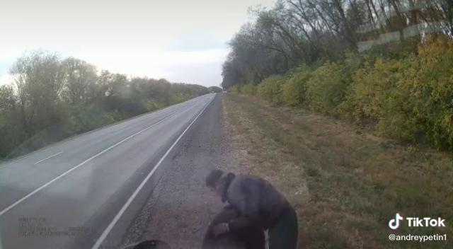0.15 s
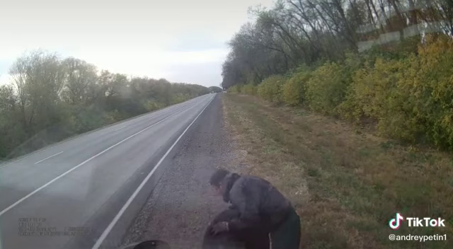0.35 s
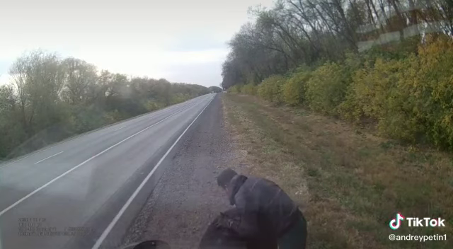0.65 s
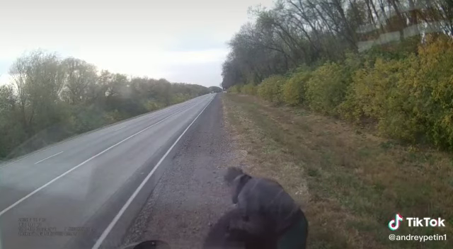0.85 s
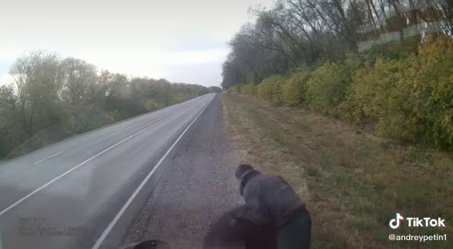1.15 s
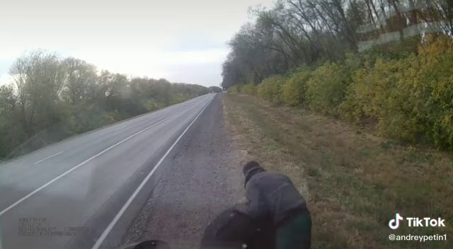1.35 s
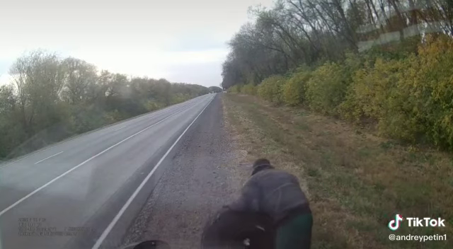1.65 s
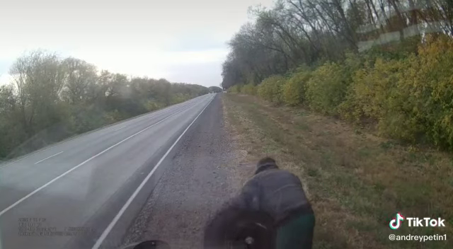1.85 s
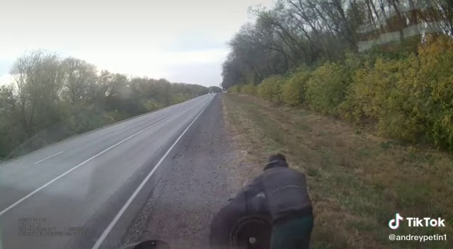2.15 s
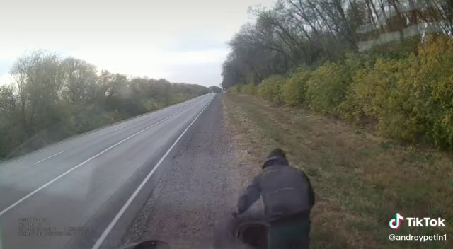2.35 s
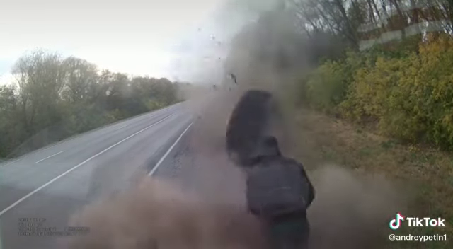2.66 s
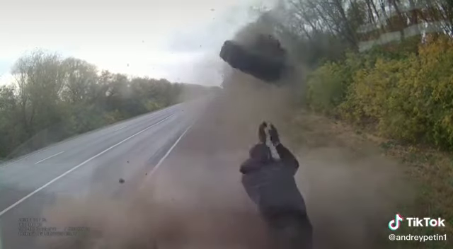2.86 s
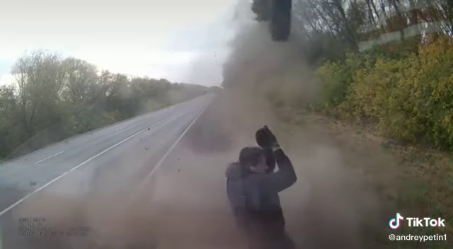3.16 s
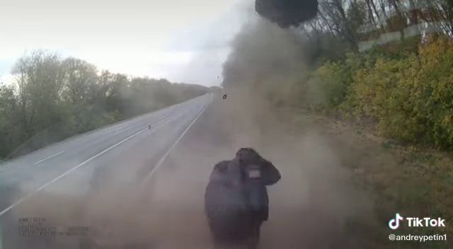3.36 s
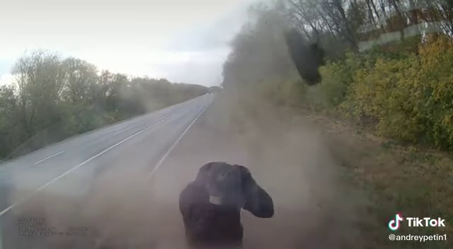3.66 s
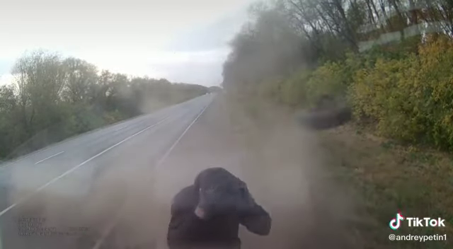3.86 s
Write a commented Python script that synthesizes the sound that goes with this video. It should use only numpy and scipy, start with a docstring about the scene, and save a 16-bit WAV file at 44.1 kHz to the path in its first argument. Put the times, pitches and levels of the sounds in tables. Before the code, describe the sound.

A violent tyre burst breaks a quiet fan hum in a car cabin; the close microphone distorts, harsh grit sprays the windscreen, stones ping and thud, clods knock the bonnet, and falling dirt patters.

```python
"""Heard from inside a parked car on a gravel verge: a fan hums and hisses (filtered noise) throughout.
A tyre bursts: swinging cabin modes and noise make a thump and boom that overload the microphone.
A spray of grit, made of random clicks, hits the windscreen, and single stones crack, ring and thud on the car.
Heavy clods ring the bonnet while sand, then earth with pebbles, patters down in more random clicks."""
import sys
import numpy as np
from scipy import signal
from scipy.fft import rfft, irfft
from scipy.io import wavfile
from scipy.ndimage import map_coordinates

SR = 44100
rng = np.random.default_rng(int(sys.argv[2]) if len(sys.argv) > 2 else 0)


def digitize_waveform(pressure):
    """Quantize a signal to 16-bit integers and store it at the path in sys.argv[1].

    Rows of a 2-D input are taken as channels; values are limited to [-1, 1].
    """
    field = np.atleast_2d(pressure).T
    bounded = np.clip(field, -1, 1)
    quanta = np.round(bounded * 32767).astype(np.int16)
    wavfile.write(sys.argv[1], SR, quanta)


N = 176400
TIME = np.arange(N) / SR  # seconds
FREQS = np.maximum(np.fft.rfftfreq(N, 1 / SR), 1)  # Hz, kept above zero for the logarithm

# In every spectrum only the shape counts, because the filtered sound is scaled to rms 1.
# A t60 is the time in seconds that a sound takes to fade by 60 dB.

# Tone of the fan's air. Each row: frequency in Hz, strength in relative dB per Hz.
FAN_SPECTRUM = [(30, 9), (50, 1), (78, 8), (102, 0), (215, 6.5), (285, -4.5), (450, 4), (850, -7.5),
                (1200, -3.5), (2300, -1.5), (3300, -6), (5000, -3.5), (6700, -16), (7500, -21.5),
                (9800, -20), (12700, -12.5), (15600, -18)]
# Resonances of the fan's ducts. Each row: frequency in Hz, width in Hz, height in dB above the spectrum.
DUCT_RESONANCES = [(352, 32, 12.5), (733, 32, 16.8), (933, 17, 13.7), (1425, 32, 11.2), (1842, 11, 14),
                   (2137, 22, 16.6), (2325, 28, 10.5), (2790, 150, 1.9), (4990, 74, 5), (6720, 310, 10.7)]
FAN_DB, FAN_WAVER_S, FAN_WAVER_PER_S = -46.5, 0.00025, 3.25  # waver: size of the time shift, and its pace
IDLE_HZ, IDLE_WIDTH_HZ, IDLE_DB = 83.7, 3.3, -64.5  # faint low hum; width of each of its two filters

# Tone of the blast's boom in the cabin. Each row: frequency in Hz, strength in relative dB per Hz.
BOOM_SPECTRUM = [(30, -14), (70, 5), (170, 6), (420, -5), (930, -2.5), (1150, -10), (2500, -14),
                 (8000, -45)]
# Resonances of the cabin. Each row: frequency in Hz, width in Hz, height in dB above the spectrum.
CABIN_RESONANCES = [(207, 35, 2.6), (332, 52, 4.5), (552, 41, 8.4), (699, 38, 4.8), (770, 40, 1.7),
                    (855, 33, 5.4), (955, 15, 1.6)]
# Tone of the slow pressure wave. Each row: frequency in Hz, strength in relative dB per Hz.
PUSH_SPECTRUM = [(15, -15), (45, -12), (85, -5.5), (140, -13.5), (200, -18), (340, -9.5), (700, -11.5),
                 (1100, -39)]
# Lowest cabin modes. Each row: frequency in Hz, width in Hz, height in dB above the spectrum.
PUSH_RESONANCES = [(76.5, 7.7, 8), (123, 12, 12.5)]
BURST_S, BURST_ATTACK_S, BURST_HOLD_S = 2.406, 0.014, 0.017
THUMP_DB, THUMP_T60_S = -22.5, 0.11  # level of each mode in the first blow
BOOM_DB, BOOM_T60_S = -21, 1.38
SURGE_DB, SURGES_PER_S = 1, 23  # typical size and pace of the surges in the boom
PUSH_DB, PUSH_ATTACK_S, PUSH_HOLD_S, PUSH_T60_S = -13.5, 0.015, 0.022, 0.34

# Strength of the grit spray over time. Each row: time in seconds, level in dB.
SPRAY_LEVEL = [(2.405, -71), (2.413, -55), (2.417, -17), (2.443, -16), (2.453, -5), (2.483, -17.5),
               (2.506, -12.5), (2.56, -19.5), (2.602, -21), (2.64, -7.5), (2.688, -28), (2.716, -12),
               (2.775, -21.5), (2.805, -25.5), (2.83, -35), (2.96, -54), (3.1, -79)]
# Tone of the grit. Each row: frequency in Hz, strength in relative dB per Hz.
GRIT_SPECTRUM = [(150, -14.5), (600, -2), (1200, -1), (1800, -0.5), (2250, 2.5), (3000, 0), (4500, -1.5),
                 (6800, -1.5), (8000, -5), (11000, -13), (15500, -15.5)]
GRIT_PER_S, GRIT_SPREAD_DB = 4000, 6
SPOT_T60_S, SPOT_WET_DB = 0.048, 3.5  # reflections from each spot that the debris hits

# Stones striking the car. Each row: start in seconds, level in dB, ring pitch in Hz, ring in dB,
# t60 in seconds, thud in dB. Ring and thud are relative to the row's level.
STONE_HITS = [(2.415, -13.5, 3530, -9, 0.091, -8), (2.4327, -8.5, 3290, -5, 0.015, -21),
              (2.498, -10, 6440, -18, 0.012, 7), (2.636, 12.5, 4300, -35, 0.031, -9.5),
              (2.6644, 4, 6690, -13, 0.02, -27), (2.674, -7, 5520, -17, 0.085, -7.5),
              (2.71, 0.5, 5860, -7, 0.023, -27), (2.7432, -15.5, 3300, -4, 0.03, -7),
              (2.7833, -13.5, 5320, -9, 0.0082, -2), (2.806, -17.5, 2290, -7, 0.029, -10.5),
              (2.8384, -6.5, 6400, -16, 0.0048, -24), (2.8705, -25, 2310, -9.5, 0.11, -11.5),
              (2.924, -28.5, 5830, -6.5, 0.12, -27), (2.984, -32.5, 3140, -12, 0.11, -18),
              (3.062, -31.5, 3860, -9, 0.14, -26), (3.0837, -16.5, 3310, -8.5, 0.076, -11),
              (3.154, -19, 4840, -9, 0.085, -32), (3.159, -31, 2175, -1, 0.045, -35),
              (3.2474, -30.5, 2200, -6, 0.019, -6), (3.3614, -16.5, 2560, -7, 0.14, -9),
              (3.376, -25, 2840, -3, 0.1, -6), (3.464, -27, 1590, -22, 0.032, -7),
              (3.5518, -28, 3770, -17, 0.0086, -24), (3.572, -31, 3860, -4, 0.022, -13),
              (3.6009, -15, 3800, -11, 0.051, -32), (3.624, -30, 2317, 12, 0.025, -3),
              (3.6315, -33.5, 2310, 1, 0.075, 2.5), (3.6805, -31.5, 6120, -6, 0.1, -14),
              (3.696, -28.5, 1666, -4, 0.16, -16), (3.7865, -20, 6750, 11, 0.0042, -17),
              (3.789, -32.5, 6260, 4, 0.11, -10), (3.805, -29, 10250, -5, 0.03, -21),
              (3.831, -39.5, 1700, 5, 0.12, -13)]
# Tone of a stone's crack. Each row: frequency in Hz, strength in relative dB per Hz.
CRACK_SPECTRUM = [(300, -9), (1200, -15), (1900, -1), (2600, -1), (4500, -2), (6600, -1), (8000, -7.5),
                  (11000, -15), (15500, -16.5)]
STONE_ATTACK_S, STONE_HOLD_S = 0.00053, 0.0003
CHIPS_PER_S, CHIP_SPREAD_DB = 16000, 1
RING_WIDTH_HZ, RING_ROUGH_DB = 710, -0.5  # the rattle in a stone's ring

# Heavy clods landing on the bonnet. Each row: start in seconds, level in dB, pitch in Hz.
CLOD_HITS = [(2.486, -14.5, 562), (2.490, -14, 980), (2.565, -18.5, 262), (2.652, -19, 622),
             (3.364, -17.5, 850), (3.374, -20, 296), (3.387, -20.5, 595), (3.697, -28, 349),
             (3.864, -29.5, 502), (3.884, -29.5, 638)]
# Tone of the car's panel. Each row: frequency in Hz, strength in relative dB per Hz.
PANEL_SPECTRUM = [(50, -30), (100, -11.5), (200, -5), (450, -6.5), (900, -10.5), (1300, -17), (3000, -37.5)]
# Resonances of the panel. Each row: frequency in Hz, width in Hz, height in dB above the spectrum.
PANEL_RESONANCES = [(235.7, 13, 10.7), (396, 32, 6), (557, 40, 10.8), (609, 26, 8.2), (674, 40, 12),
                    (820, 10.5, 13), (1012, 25, 14)]
CLOD_ATTACK_S, CLOD_HOLD_S, CLOD_T60_S = 0.0036, 0.002, 0.11
CLOD_THUD_DB, CLOD_SPREAD_OCTAVES = -7, 0.35  # spread: how far from its pitch a clod excites the modes

# Strength of the falling sand over time. Each row: time in seconds, level in dB.
SAND_LEVEL = [(2.7, -72), (2.85, -32), (2.965, -43.5), (3.02, -35.5), (3.14, -40), (3.205, -38.5),
              (3.24, -32.5), (3.29, -34.5), (3.32, -36), (3.42, -41), (3.55, -40), (3.665, -42.5),
              (3.78, -33), (3.87, -37), (4.0, -42)]
# Tone of the sand. Each row: frequency in Hz, strength in relative dB per Hz.
SAND_SPECTRUM = [(150, -29), (350, -11), (1150, -4.5), (1800, -2.5), (2300, 2.5), (3200, -1.5),
                 (4700, -3.5), (6500, -2), (8000, -10), (11000, -17), (15500, -22)]
SAND_PER_S, SAND_SPREAD_DB = 910, 1.5

# Strength of the falling earth over time. Each row: time in seconds, level in dB.
EARTH_LEVEL = [(2.9, -62), (3.2, -47.5), (3.34, -43.5), (3.44, -35), (3.53, -44), (3.66, -37), (3.71, -37),
               (3.75, -36), (3.87, -35), (4.0, -37)]
# Tone of the earth on the bodywork. Each row: frequency in Hz, strength in relative dB per Hz.
EARTH_SPECTRUM = [(50, -23), (100, -8), (230, 4), (400, -1), (560, 4), (1000, 0), (1650, 1), (2500, -1),
                  (5000, -28)]
EARTH_PER_S, EARTH_SPREAD_DB = 930, 2.5
PEBBLES_PER_S, PEBBLE_SPREAD_DB, PEBBLE_DB = 240, 3, -3.5  # level relative to the earth
PEBBLE_LOW_HZ, PEBBLE_HIGH_HZ, PEBBLE_Q = 320, 2502, 70  # Q: pitch divided by width

OVERLOAD = 0.22  # the largest swing the microphone can pass on
LOW_CUT_HZ, AIR_HZ, CUTOFF_HZ = 195, 13600, 15700


def from_db(db):
    """Turn decibels into a gain."""
    return 10 ** (np.asarray(db) / 20)


def rms_one(x):
    """Scale a sound to an average power of 1."""
    return x / np.sqrt(np.mean(x ** 2) + 1e-20)


def level(curve):
    """Follow a curve of times and dB: silent before its first row, steady after its last."""
    seconds, db = np.transpose(curve)
    return from_db(np.interp(TIME, seconds, db)) * (TIME >= seconds[0])


def envelope(start, attack, hold, t60):
    """Rise in a straight line, hold, then die away exponentially."""
    age = TIME - start
    rise = np.clip(age / attack, 0, 1)
    decay = from_db(-60 * np.clip((age - attack - hold) / t60, 0, 3))
    return rise * decay


def colour(x, spectrum, resonances=()):
    """Filter a sound to a smooth spectrum with resonant peaks, without sounding ahead of it; rms 1."""
    hz, db = np.transpose(spectrum)
    peaks = 1
    for peak_hz, width_hz, height_db in resonances:
        peaks = peaks + from_db(2 * height_db) / (1 + (2 * (FREQS - peak_hz) / width_hz) ** 2)
    gain = from_db(np.interp(np.log(FREQS), np.log(hz), db)) * np.sqrt(peaks)
    # Folding the cepstrum gives the minimum-phase filter: the same gain, with the earliest response.
    cepstrum = irfft(np.log(gain), N)
    cepstrum[1:N // 2] *= 2
    cepstrum[N // 2 + 1:] = 0
    response = np.exp(rfft(cepstrum))
    return rms_one(irfft(rfft(x) * response, N))


def noise(spectrum, resonances=()):
    """Make steady noise with a given tone."""
    return colour(rng.standard_normal(N), spectrum, resonances)


def resonate(x, hz, width_hz):
    """Ring a single resonance, wider meaning shorter; rms 1."""
    radius = np.exp(-np.pi * width_hz / SR)
    feedback = [1, -2 * radius * np.cos(2 * np.pi * hz / SR), radius * radius]
    return rms_one(signal.lfilter([1, 0, -1], feedback, x))


def sine(start, hz):
    """A pure swing that crosses zero upwards at the start time; rms 1."""
    return np.sqrt(2) * np.sin(2 * np.pi * hz * (TIME - start))


def drift(per_s):
    """Wander slowly by chance around zero, with a typical size of 1."""
    slow = rfft(rng.standard_normal(N)) / (1 + (FREQS / per_s) ** 4)
    return rms_one(irfft(slow, N))


def cabin(x, t60, wet_db):
    """Add dense, quickly dying reflections in the small cabin, keeping about the same power."""
    age = TIME[:SR // 10]
    echoes = rng.standard_normal(len(age)) * from_db(-60 * age / t60)
    echoes = echoes / np.linalg.norm(echoes)
    wet = from_db(wet_db)
    reflected = signal.fftconvolve(x, echoes)[:N]
    return (x + wet * reflected) / np.hypot(1, wet)


def grains(per_s, spread_db):
    """Scatter tiny clicks at random, mostly small and a few large."""
    sizes = from_db(spread_db * np.minimum(rng.exponential(1, N), 4))
    signs = rng.choice([-1, 1], N)
    hits = rng.random(N) < per_s / SR
    return sizes * signs * hits


def patter(per_s, spread_db, count=14):
    """Share grains among several spots of the car, each with its own reflections."""
    return sum(cabin(grains(per_s / count, spread_db), SPOT_T60_S, SPOT_WET_DB) for _ in range(count))


def fan():
    """Air rushes unsteadily through resonant ducts, its hiss rippled by reflections, over a faint hum."""
    air = noise(FAN_SPECTRUM, DUCT_RESONANCES)
    low_pass = signal.butter(4, 3000, fs=SR, output="sos")
    low = signal.sosfiltfilt(low_pass, air)
    hiss = cabin(air - low, t60=0.07, wet_db=-5)
    # Reading the sound slightly early or late makes its tones waver.
    read_times = TIME + FAN_WAVER_S * drift(FAN_WAVER_PER_S)
    rush = map_coordinates(low + hiss, [read_times * SR], order=3, mode="mirror")
    hum = resonate(rng.standard_normal(N), IDLE_HZ, IDLE_WIDTH_HZ)
    hum = resonate(hum, IDLE_HZ, IDLE_WIDTH_HZ)
    return from_db(FAN_DB) * rush + from_db(IDLE_DB) * hum


def blast():
    """The pressure front thumps the cabin modes, leaving a surging boom and a slow, strong push of air."""
    # Neighbouring modes start in opposite directions.
    modes = sum((-1) ** k * sine(BURST_S, hz) for k, (hz, _, _) in enumerate(CABIN_RESONANCES))
    thump = from_db(THUMP_DB) * modes
    thump *= envelope(BURST_S, BURST_ATTACK_S, BURST_HOLD_S, THUMP_T60_S)
    surges = from_db(BOOM_DB + SURGE_DB * drift(SURGES_PER_S))
    boom = surges * noise(BOOM_SPECTRUM, CABIN_RESONANCES)
    boom *= envelope(BURST_S, BURST_ATTACK_S, BURST_HOLD_S, BOOM_T60_S)
    push = from_db(PUSH_DB) * noise(PUSH_SPECTRUM, PUSH_RESONANCES)
    push *= envelope(BURST_S, PUSH_ATTACK_S, PUSH_HOLD_S, PUSH_T60_S)
    return thump + boom + push


def grit_spray():
    """Thousands of grains a second strike the windscreen, coloured by the cabin's resonances."""
    return level(SPRAY_LEVEL) * colour(patter(GRIT_PER_S, GRIT_SPREAD_DB), GRIT_SPECTRUM, CABIN_RESONANCES)


def stones():
    """Each stone cracks in a rush of chips, rings briefly at its own pitch and thuds in the panel."""
    thud = noise(PANEL_SPECTRUM, PANEL_RESONANCES)
    chips = grains(CHIPS_PER_S, CHIP_SPREAD_DB)
    crack = colour(chips, CRACK_SPECTRUM)
    out = np.zeros(N)
    for start, db, ring_hz, ring_db, t60, thud_db in STONE_HITS:
        glass = cabin(crack, t60=0.03, wet_db=-1)
        rattle = from_db(RING_ROUGH_DB) * resonate(chips, ring_hz, RING_WIDTH_HZ)
        ring = sine(start, ring_hz) + rattle
        tone = glass + from_db(ring_db) * ring + from_db(thud_db) * thud
        out += from_db(db) * envelope(start, STONE_ATTACK_S, STONE_HOLD_S, t60) * tone
    return out


def clods():
    """Each clod thuds briefly and rings the bonnet's modes, most of all those near its own pitch."""
    thud = noise(PANEL_SPECTRUM, PANEL_RESONANCES)
    out = np.zeros(N)
    for start, db, pitch_hz in CLOD_HITS:
        knock = from_db(CLOD_THUD_DB) * thud * envelope(start, CLOD_ATTACK_S, CLOD_HOLD_S, CLOD_T60_S)
        for hz, width_hz, _ in PANEL_RESONANCES:
            octaves_away = np.log2(hz / pitch_hz)
            share = 0.5 * np.exp(-(octaves_away / CLOD_SPREAD_OCTAVES) ** 2)
            ring_t60 = np.log(1000) / (np.pi * width_hz)  # a narrow resonance rings longer
            knock += share * sine(start, hz) * envelope(start, CLOD_ATTACK_S, 0, ring_t60)
        out += from_db(db) * knock
    return out


def sand_fall():
    """Sand trickles down as many small clicks of nearly even size."""
    return level(SAND_LEVEL) * colour(patter(SAND_PER_S, SAND_SPREAD_DB), SAND_SPECTRUM)


def pebbles(count=22):
    """Scattered pebbles each ring one spot of the bodywork for a moment."""
    pitches = np.geomspace(PEBBLE_LOW_HZ, PEBBLE_HIGH_HZ, count) * rng.uniform(0.96, 1.04, count)
    out = np.zeros(N)
    for hz in pitches:
        hits = grains(PEBBLES_PER_S / count, PEBBLE_SPREAD_DB) + 1e-18  # never exactly silent
        out += resonate(hits, hz, hz / PEBBLE_Q)
    return rms_one(out)


def earth_fall():
    """Earth drums on the bodywork as low-pitched grains, with ringing pebbles among it."""
    earth = colour(patter(EARTH_PER_S, EARTH_SPREAD_DB), EARTH_SPECTRUM)
    return level(EARTH_LEVEL) * (earth + from_db(PEBBLE_DB) * pebbles())


def scene():
    """Add up all the sounds as they reach the microphone in the car, in one channel."""
    debris = grit_spray() + stones() + clods() + sand_fall() + earth_fall()
    return (fan() + blast() + debris)[None]


def record(dry):
    """The microphone squashes large swings, loses deep bass and some treble, and the top is cut."""
    x = OVERLOAD * np.tanh(dry / OVERLOAD)
    x = signal.sosfilt(signal.butter(2, LOW_CUT_HZ, "high", fs=SR, output="sos"), x)
    x = signal.sosfilt(signal.butter(1, AIR_HZ, fs=SR, output="sos"), x)
    # A steep filter: 0.2 dB of ripple below the cutoff, 80 dB of loss above.
    return signal.sosfilt(signal.ellip(10, 0.2, 80, CUTOFF_HZ, fs=SR, output="sos"), x)


dry = scene()
out = record(dry)
digitize_waveform(out)
```